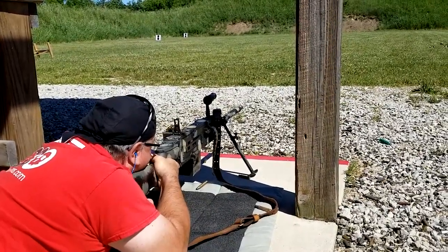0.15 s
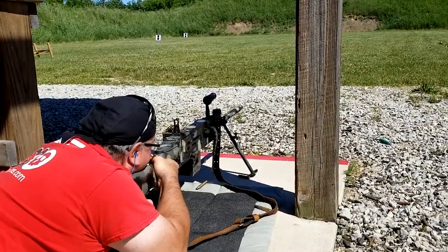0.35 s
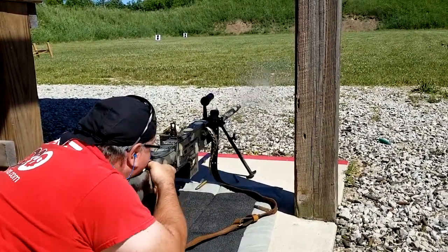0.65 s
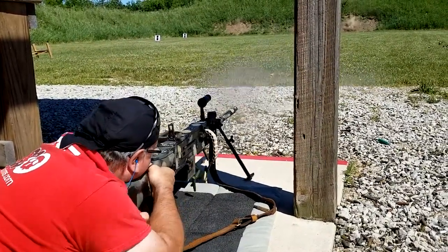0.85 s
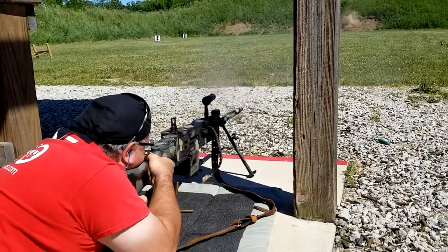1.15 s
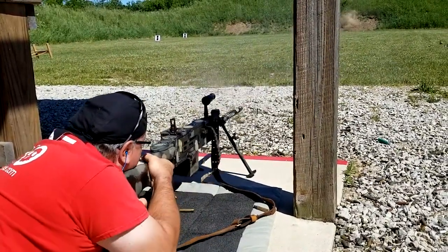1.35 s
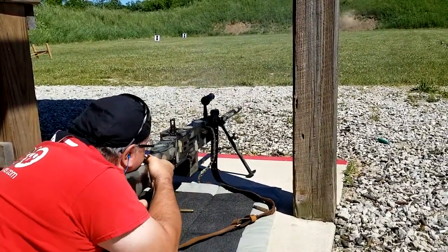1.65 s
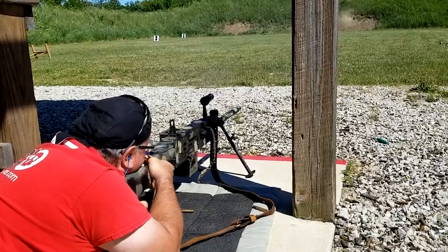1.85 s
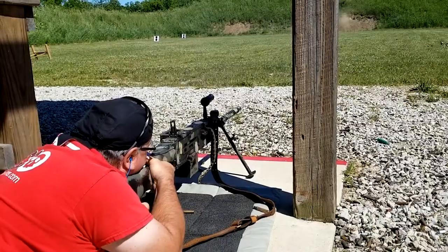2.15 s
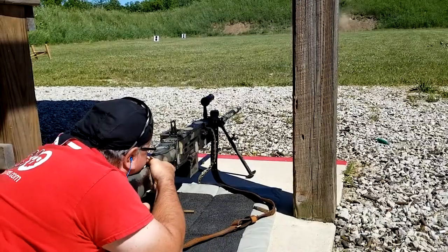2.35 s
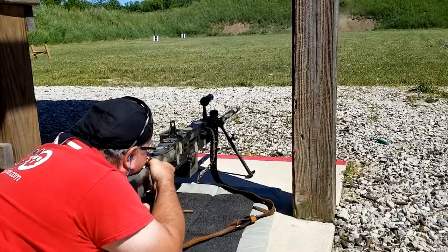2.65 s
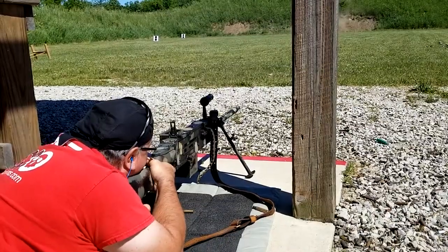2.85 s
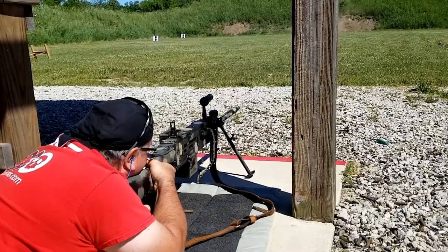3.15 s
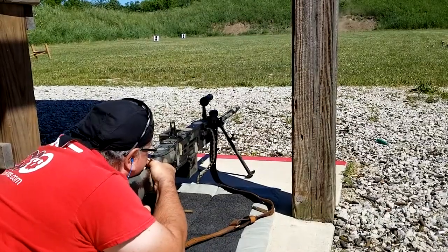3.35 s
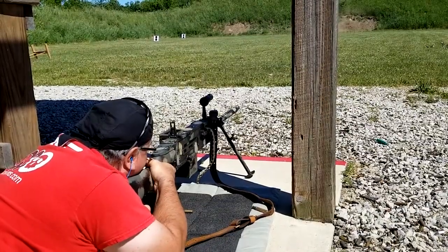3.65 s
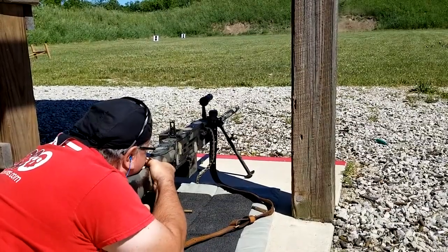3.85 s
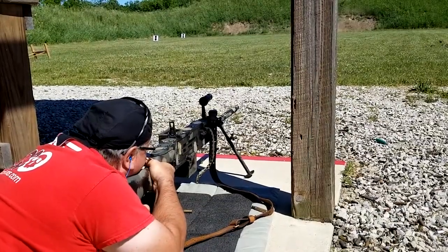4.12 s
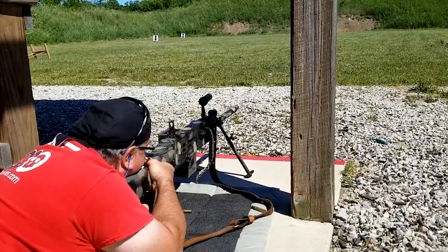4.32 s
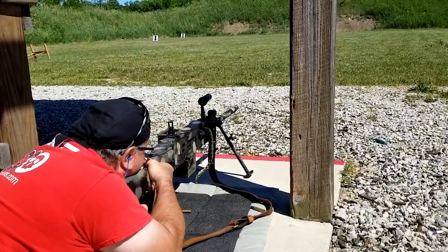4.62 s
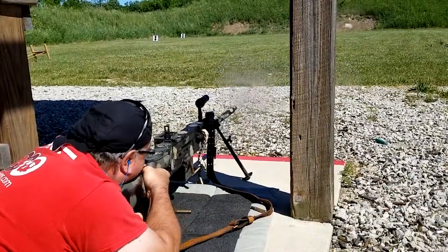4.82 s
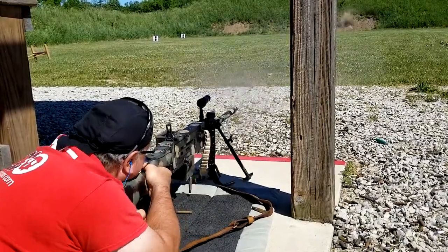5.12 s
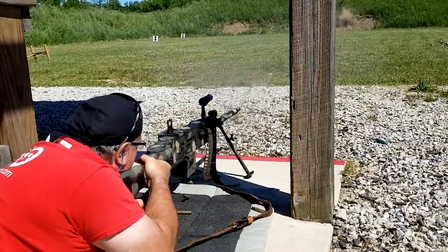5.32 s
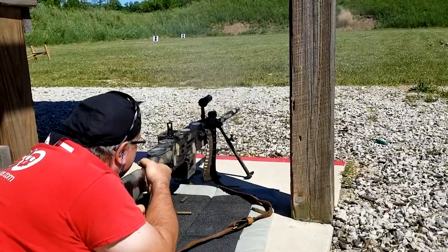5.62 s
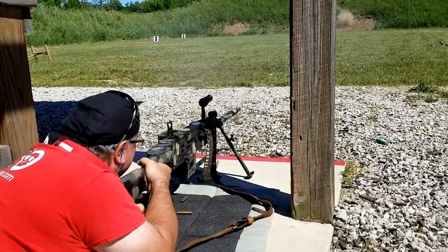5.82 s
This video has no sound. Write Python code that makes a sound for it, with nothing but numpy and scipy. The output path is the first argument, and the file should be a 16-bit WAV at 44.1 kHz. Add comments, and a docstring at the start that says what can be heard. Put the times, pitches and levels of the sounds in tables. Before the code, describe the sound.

A heavy rifle booms, a sharper one cracks, and a nearby machine gun fires two rapid bursts, spent cases tinkling on concrete.

```python
"""Under a soft outdoor rush gun parts clack and a distant shot thuds; a heavy rifle fires, then a sharp one
in another lane. A machine gun under the range's roof answers with seven rounds; cases ring on the concrete.
Single rifle shots and more clacks follow, then a second seven-round burst, its cases and a last sharp shot.
Each blast is a direct wave plus filtered noise for its reflections in the shelter; a decaying noise
response returns it from field and earth bank. The blasts overload the microphones, a soft limiter."""
import sys
import numpy as np
from scipy import signal
from scipy.fft import rfft, irfft, next_fast_len
from scipy.io import wavfile
from scipy.ndimage import uniform_filter1d

SR = 44100
rng = np.random.default_rng(int(sys.argv[2]) if len(sys.argv) > 2 else 0)


def persist_wave(psi):
    """Save psi, clipped to +-1, as 16-bit WAV."""
    counts = np.round(np.clip(psi, -1, 1) * 32767).astype(np.int16)
    wavfile.write(sys.argv[1], SR, np.atleast_2d(counts).T)


N = 263699
SHOT_LEN = 32768  # samples in one blast, noise burst or bounce


def undb(db):
    """Level definition: decibels to amplitude ratio."""
    return 10 ** (np.asarray(db) / 20)


def freqs(size):
    """Discrete Fourier frequencies in Hz for this many samples, with zero raised to 1 Hz."""
    return np.maximum(np.fft.rfftfreq(size, 1 / SR), 1)


def along(points, hz):
    """Logarithmic frequency scale: interpolate (f/Hz, value) points on it."""
    f, value = np.transpose(points)
    return np.interp(np.log(hz), np.log(f), value)


def add(out, s, sound):
    """Superposition: mix a sound in at time s."""
    start = max(int(s * SR), 0)
    part = sound[:, :N - start]
    out[:, start:start + part.shape[1]] += part


def wander(count, size):
    """Random modulation: a smoothed curve of standard deviation 1 that changes over about size points."""
    curve = rng.standard_normal(count)
    for _ in range(2):
        curve = uniform_filter1d(curve, size, mode="wrap")
    return curve / curve.std()


def diffuse(size, lag_s=0, alike_hz=800):
    """Diffuse-field coherence: noise spectra alike in the bass, unrelated in the treble, the right one late."""
    hz = freqs(size)
    mid, side = rfft(rng.standard_normal((2, size)))
    coherence = 0.82 / (1 + (hz / alike_hz) ** 4)
    mid = mid * np.sqrt((1 + coherence) / 2)
    side = side * np.sqrt((1 - coherence) / 2)
    return np.array([mid + side, (mid - side) * np.exp(-2j * np.pi * hz * lag_s)])


def hump(hz, centre_hz, octaves):
    """Band-pass weighting: a Gaussian gain on the octave scale."""
    return np.exp(-.5 * (np.log2(hz / centre_hz) / octaves) ** 2)


def swell(delay, hold, t60, rise_s=0.0011):
    """Exponential decay: an envelope that rises after its delay, holds and falls 60 dB in t60 seconds."""
    t = np.arange(SHOT_LEN) / SR - max(delay, 0)
    return np.clip(t / rise_s, 0, 1) * np.exp(-np.log(1000) * np.maximum(t - hold, 0) / t60)


# spectrum of the outdoor rush: f/Hz, relative level/dB
AIR_SPECTRUM = [(25, -7.5), (100, -4), (260, 2.5), (420, -0.5), (650, -5), (1200, -13), (3000, -13.5),
                (6000, -19), (8500, -28.5), (11600, -23), (16000, -42.5)]
# course of the rush: t/s, RMS level/dB
AIR_LEVELS = [(0, -52), (1.9, -61), (2.6, -63.5), (3.22, -72), (3.501, -56.5), (4.3, -74), (4.65, -60),
              (5.98, -61)]


def air():
    """Shaped broadband noise: a soft outdoor rush that rises and sinks."""
    size = next_fast_len(N + N % 2, True)
    spectrum = diffuse(size, alike_hz=600) * undb(along(AIR_SPECTRUM, freqs(size)))
    rush = irfft(spectrum, size)[:, :N]
    return rush / rush.std() * undb(np.interp(np.arange(N) / SR, *np.transpose(AIR_LEVELS)))


# the field's answer: f/Hz, relative level/dB
FIELD_RESPONSE = [(60, 5), (250, 0.5), (550, -9.5), (1200, -7), (2800, -1), (5000, 0), (8000, 1),
                  (12000, -8), (16000, -15.5)]
# its reverberation: f/Hz, t60/s
FIELD_DECAY = [(100, 2.2), (300, 1.92), (1000, 2.4), (3000, 1.62), (6000, 1.01), (13000, 0.44)]


def field(blasts, start_s=.05, full_s=0.18, patchy_db=2.5):
    """Scattering and air absorption: grass, trees and bank return the blasts late and ever duller."""
    size = 3 * SHOT_LEN
    hz, t = freqs(size), np.arange(size) / SR
    noise = diffuse(size, alike_hz=500) * undb(along(FIELD_RESPONSE, hz))
    centres, t60s = np.transpose(FIELD_DECAY)  # the air swallows the treble first
    tail = np.zeros((2, size))
    for share, t60 in zip(np.eye(len(centres)), t60s):
        band = np.interp(np.log(hz), np.log(centres), share)  # overlapping bands that sum to 1
        tail += irfft(noise * band) * np.exp(-np.log(1000) * np.maximum(t - full_s, 0) / t60)
    tail *= np.interp(t, [start_s, full_s], [0, 1])
    tail *= undb(patchy_db * wander(size, size=1100)) / np.sqrt(SR)
    return signal.fftconvolve(blasts, tail, axes=1)[:, :N]


def noise_bursts(events, hold, octaves):
    """Damped band noise: each burst holds briefly and dies away."""
    out = np.zeros((2, N))
    for s, db, t60, centre in events:
        noise = irfft(diffuse(SHOT_LEN) * hump(freqs(SHOT_LEN), centre, octaves))
        add(out, s, undb(db) * swell(0, hold, t60) * noise / noise.std())
    return out


# clacks of gun parts, and the bright echo after the second heavy shot (3.744 and 3.775 s):
# t/s, level/dB, t60/s, centre f/Hz
CLACK_AND_ECHO_EVENTS = [(.031, -54, .02, 2200), (.058, -44, .045, 2040), (2.381, -40.5, 0.054, 2420),
                         (2.509, -52.5, .035, 6050), (2.962, -67, .21, 6500), (3.744, -36, 0.099, 6140),
                         (3.775, -28, 0.22, 2780), (4.503, -51.5, .28, 2850), (5.147, -48, 0.056, 4000),
                         (5.198, -24, .045, 3780)]
# dull booms: a distant shot, the first sharp shot's late boom, a sharp shot's echo from the bank:
# t/s, level/dB, t60/s, centre f/Hz
BOOM_EVENTS = [(.046, -46, 0.26, 549), (.416, -15, 0.071, 890), (4.477, -51, 0.13, 740)]


def clacks_and_booms():
    """Damping: clacks and a bright echo die after a short hold, dull booms after a longer one."""
    short_bursts = noise_bursts(CLACK_AND_ECHO_EVENTS, hold=.002, octaves=.66)
    dull_booms = noise_bursts(BOOM_EVENTS, hold=.021, octaves=.75)
    return short_bursts + dull_booms


# modes of a brass case: f/Hz before the pitch ratio, relative level/dB, t60/s
CASE_MODES = [(9780, -2, .3), (9880, 0, .28), (10250, -6, .22), (14400, -2, .35), (14650, -8, .22)]
# single cases landing in other lanes: t/s, level/dB, pitch ratio
STRAY_LANDINGS = [(.99, -50, 0.98), (2.97, -64.5, 1.15), (4.36, -70, 1.297), (5.875, -62, 1.025)]


def cases(landed, scatter_db=4.0, loss_db=5, count=3):
    """Modal excitation: each bounce of a case favours other modes, and the tumbling makes them flutter."""
    out, t = np.zeros((2, N)), np.arange(SHOT_LEN) / SR
    rings = [undb(db) * swell(0, 0, t60) for _, db, t60 in CASE_MODES]
    for s, db, pitch in [*landed, *STRAY_LANDINGS]:
        tones = [ring * np.exp(2j * np.pi * hz * pitch * t) for (hz, _, _), ring in zip(CASE_MODES, rings)]
        flutter = undb(scatter_db * wander(SHOT_LEN, size=250))
        for bounce in range(count):
            strength, phase = rng.standard_normal((2, 2, len(CASE_MODES)))
            weights = undb(scatter_db * strength) * np.exp(2j * np.pi * phase)
            sound = (weights @ tones).imag
            landing_s = s + bounce * rng.uniform(0.027, 0.041)
            add(out, landing_s, undb(db - loss_db * bounce) * flutter * sound)
    return out


def voiced(x, gain, size=41):
    """Minimum phase: a causal filter imposes the spectrum, so resonances ring after the attack."""
    spectrum = rfft(x)
    power = uniform_filter1d(abs(spectrum) ** 2, size, axis=-1)
    cepstrum = irfft(np.log(gain) - .5 * np.log(np.maximum(power, 1e-9)))
    # fold the cepstrum onto positive times
    cepstrum[:, 1:SHOT_LEN // 2] *= 2
    cepstrum[:, SHOT_LEN // 2 + 1:] = 0
    return irfft(spectrum * np.exp(rfft(cepstrum)))


def front(level_db, lag_s, push_s, bass_hz):
    """Blast wave: a jump in pressure, then a longer suction, later at the right microphone."""
    t = np.arange(SHOT_LEN) / SR
    age = np.maximum(t - np.array([[0], [lag_s]]), 0) / push_s
    wave = (age > 0) * (1 - age) * np.exp(-age)
    band = signal.butter(2, [bass_hz, 3500], "bandpass", fs=SR, output="sos")
    return undb(level_db) * signal.sosfilt(band, wave)


def gun(shots, direct, paths, colour, modes, energy_db, repeat_hz, lag_s, alike_hz, clump_db=1.8, ripple_db=2):
    """Multipath propagation: each shot is its direct wave and a swarm of reflections."""
    hz, out = freqs(SHOT_LEN), np.zeros((2, N))
    resonance_db = sum(db / (1 + (2 * (hz - f) / width) ** 2) for f, width, db in modes)
    gain = undb(along(colour, hz) + resonance_db)
    gain *= undb(energy_db) * np.sqrt(SR / np.mean(gain ** 2))
    arrivals = []
    for delay, db, hold, t60, centre, octaves in paths:
        rise_s = min(0.0016 + .5 * delay ** 2, .025)  # the longer the way, the softer the attack
        arrivals.append((undb(db) * swell(delay, hold, t60, rise_s), hump(hz, centre, octaves)))
    shelter = diffuse(SHOT_LEN, lag_s, alike_hz)
    # the muzzle shifts a little between shots: long waves repeat, short ones scatter anew
    same = 1 / (1 + (hz / repeat_hz) ** 2)
    for s, db in shots:
        scatter = np.sqrt(same) * shelter + np.sqrt(1 - same) * diffuse(SHOT_LEN, lag_s, alike_hz)
        blast = sum(envelope * irfft(scatter * band) for envelope, band in arrivals)
        # reflections bunch in time, and the strong ones comb the spectrum
        clumps = undb(clump_db * wander(SHOT_LEN, size=90))
        comb = undb(ripple_db * np.sqrt(1 - same) * wander(len(hz), size=110))
        add(out, s, undb(db) * (direct + voiced(blast * clumps, gain * comb)))
    return out


# sharp rifle shots: t/s, relative level/dB
SHARP_FIRED = [(.3932, 2.5), (2.134, 4), (4.0222, 0.5), (5.588, 0.5)]
# crack, rattle under the roof, boom off the roof, action cycling, echoes from the trees and the bank:
# delay/s, relative level/dB, hold/s, t60/s, centre f/Hz, spread/octaves
SHARP_ARRIVALS = [(0, 7, 0.013, 0.099, 12000, 2.5), (0, 5.5, 0.017, 0.34, 1200, 3),
                  (.012, 0.5, 0.029, .08, 744, .75), (.088, -15, .004, 0.041, 12330, 1.4),
                  (.324, -43, .04, .4, 2500, 1.5), (.43, -32, 0.046, .2, 801, .7)]
# blast spectrum: f/Hz, relative level/dB
SHARP_SPECTRUM = [(40, -45), (110, -26.5), (200, -15), (310, -3.5), (470, -4), (600, 3.5), (1400, -2),
                  (2100, -6.5), (3100, -7.5), (4000, -7), (5400, -9.5), (8500, -23.5), (12000, -20),
                  (16000, -28.5)]
# shelter resonances this muzzle excites: f/Hz, width/Hz, lift/dB
SHARP_RESONANCES = [(418, 100, 0.5), (500, 30, -1.5), (577, 26, 3), (699, 17, 2), (970, 96, 5.5),
                    (1380, 30, -1.5), (1296, 16, 2.5), (1460, 70, 1.5)]


def sharp_rifle():
    """Short positive phase: a brief pressure jump puts the direct wave high, and the shelter rattles."""
    wave = front(level_db=3, lag_s=.00045, push_s=.0006, bass_hz=300)
    return gun(SHARP_FIRED, wave, SHARP_ARRIVALS, SHARP_SPECTRUM, SHARP_RESONANCES,
               energy_db=-24.5, repeat_hz=3460, lag_s=.00045, alike_hz=1300)


# heavy rifle shots: t/s, relative level/dB
HEAVY_FIRED = [(.1535, -0.5), (3.543, -1.5)]
# thump, crack, rattle under the roof, boom off the roof, low rumble over the field, action cycling,
# bright echo from downrange, echo from the trees:
# delay/s, relative level/dB, hold/s, t60/s, centre f/Hz, spread/octaves
HEAVY_ARRIVALS = [(0, 5, .008, 0.071, 280, 0.62), (0, -3, 0.022, 0.063, 8950, 3),
                  (0, -1, .09, 0.38, 1000, 3.7), (0.033, -6, .05, 0.048, 521.5, 0.36),
                  (.05, -28, .05, 1.1, 149.8, 2), (.088, -15, 0.018, 0.43, 12000, 2.7),
                  (.197, -13.5, 0.044, .28, 5010, 0.78), (.345, -27.5, .04, 0.45, 3030, 1.4)]
# blast spectrum: f/Hz, relative level/dB
HEAVY_SPECTRUM = [(30, -36), (90, -17.5), (130, -10.5), (250, 0.5), (600, -1), (1000, -4), (2000, -7),
                  (4000, -12.5), (6500, -18.5), (8700, -33), (12000, -30), (16000, -35.5)]
# shelter resonances this muzzle excites: f/Hz, width/Hz, lift/dB
HEAVY_RESONANCES = [(152, 20, 2), (357, 19, -3), (398, 84, 5), (460, 15, -4.5), (527, 100, 5.5),
                    (702, 33, 4.5), (877, 27, 8), (1666, 45, 5)]


def heavy_rifle():
    """Long positive phase: a slower pressure pulse puts more bass in the direct wave."""
    wave = front(level_db=6, lag_s=.0004, push_s=.001, bass_hz=130)
    return gun(HEAVY_FIRED, wave, HEAVY_ARRIVALS, HEAVY_SPECTRUM, HEAVY_RESONANCES,
               energy_db=-18.0, repeat_hz=1500, lag_s=.0004, alike_hz=1320)


# machine gun bursts: trigger t/s, quickest bolt cycle/s, cycles until it is reached, relative level/dB,
# mean flight of the cases/s
BURSTS = [(.571, .0432, 2.6, 0, .64), (4.6864, .044, 2.8, -0.33, 0.48)]
CYCLE_DRAG_S = .00075  # a cycle lengthens by this times the square of its distance from the quickest one
FIRST_ROUND_DB, ROUND_SCATTER_DB = 2, 0.53  # the opening round stands out; the rest differ by chance


def rounds(count=7):
    """Cyclic mechanism: the bolt speeds up towards mid-burst and slows again; gives (t/s, level/dB)."""
    fired = []
    for s, quickest_s, run_up, db, _ in BURSTS:
        fired.append((s, db + FIRST_ROUND_DB))
        for k in range(count - 1):
            s += quickest_s + CYCLE_DRAG_S * (k - run_up) ** 2
            fired.append((s, db + ROUND_SCATTER_DB * rng.standard_normal()))
    return fired


CASE_FLIGHT_SCATTER_S = .08
CASE_DB, CASE_SCATTER_DB, CASE_DETUNE = -61, 1, 0.0062  # mean level, level spread, pitch-ratio spread


def landings(fired):
    """Ballistic delay: each round's case lands a flight later; gives (t/s, level/dB, pitch ratio)."""
    flights = np.repeat([flight for *_, flight in BURSTS], len(fired) // len(BURSTS))
    landed = []
    for (s, _), flight in zip(fired, flights):
        late, hard, sharp = rng.standard_normal(3)
        landed.append((s + flight + CASE_FLIGHT_SCATTER_S * late,
                       CASE_DB + CASE_SCATTER_DB * hard,
                       1 + CASE_DETUNE * sharp))
    return landed


# the gas ball's thump off the roof: f/Hz, relative level/dB, hold/s, t60/s
ROOF_BOOM = [(258, -15, .005, .05), (535, -8, .005, .02), (790, -13, .004, .018)]


def boom(delay_s):
    """Cavity resonance: a few strong cycles of the air under the roof, alike for every round."""
    t = np.arange(SHOT_LEN) / SR - delay_s
    wave = np.zeros(SHOT_LEN)
    for hz, db, hold, t60 in ROOF_BOOM:
        wave += undb(db) * swell(delay_s, hold, t60, rise_s=0.0046) * np.sin(2 * np.pi * hz * t)
    return wave


# muzzle crack, rattle between roof and slab, thump of the gas ball, return from the next lanes,
# low echo from along the firing line:
# delay/s, relative level/dB, hold/s, t60/s, centre f/Hz, spread/octaves
MACHINE_ARRIVALS = [(0, -5.5, .008, .08, 14290, 1.2), (0, -0.5, 0.034, 0.2, 1185, 2),
                    (.007, -3.5, 0.0067, 0.071, 268.5, 0.21), (0.034, -12, 0.033, .3, 1308, 0.93),
                    (0.121, -11, 0.013, 0.3, 248.6, 0.77)]
# blast spectrum: f/Hz, relative level/dB
MACHINE_SPECTRUM = [(30, -18.5), (70, -16), (160, -10), (240, -2), (420, -1), (600, -2), (1000, -6),
                    (2000, -5.5), (4500, -7.5), (6800, -11.5), (8200, -20.5), (9500, -19.5), (11700, -12),
                    (16000, -16.5)]
# shelter resonances this muzzle excites: f/Hz, width/Hz, lift/dB
MACHINE_RESONANCES = [(257, 30, 7), (315, 28, 4), (423, 43, -2.5), (528, 39, 4), (557, 25, 2.5),
                      (690, 34, 0), (753, 39, 5), (832, 60, 6), (2125, 43, 7), (2440, 10, 6), (3390, 21, 1)]


def machine_gun(fired):
    """Repeated excitation of a cavity: every round sets off the roof boom and the shelter's reflections."""
    return gun(fired, boom(delay_s=0.01275), MACHINE_ARRIVALS, MACHINE_SPECTRUM, MACHINE_RESONANCES,
               energy_db=-22.5, repeat_hz=999, lag_s=.0001, alike_hz=920)


def scene():
    """Superposition: three guns, their echo from the field, and the smaller sounds around the shots."""
    fired = rounds()
    sharp, heavy, machine = sharp_rifle(), heavy_rifle(), machine_gun(fired)
    echo = field(undb(-14.5) * machine + undb(-19) * heavy + undb(-21) * sharp)
    return air() + echo + clacks_and_booms() + cases(landings(fired)) + sharp + heavy + machine


def record(dry, ceiling=0.88, bass_hz=50, top_hz=16000):
    """Saturation: the microphones flatten the highest peaks; the deepest bass and the top are cut."""
    clipped = ceiling * np.tanh(dry / ceiling)
    thinned = signal.sosfilt(signal.butter(1, bass_hz, "highpass", fs=SR, output="sos"), clipped)
    return signal.sosfilt(signal.ellip(10, .2, 70, top_hz, fs=SR, output="sos"), thinned)


dry = scene()
out = record(dry)
persist_wave(out)
```